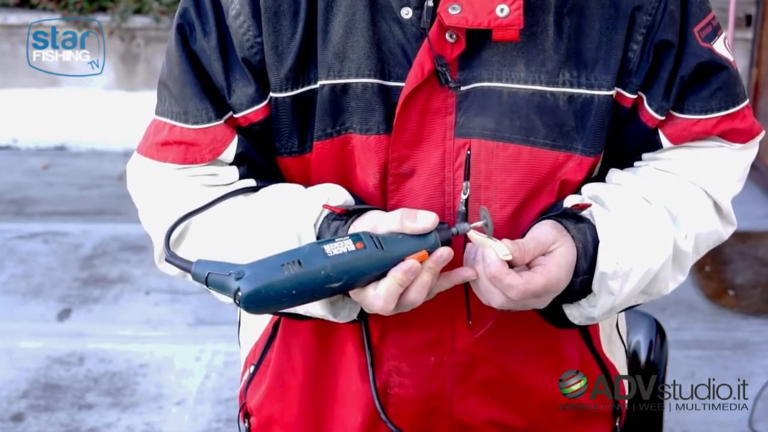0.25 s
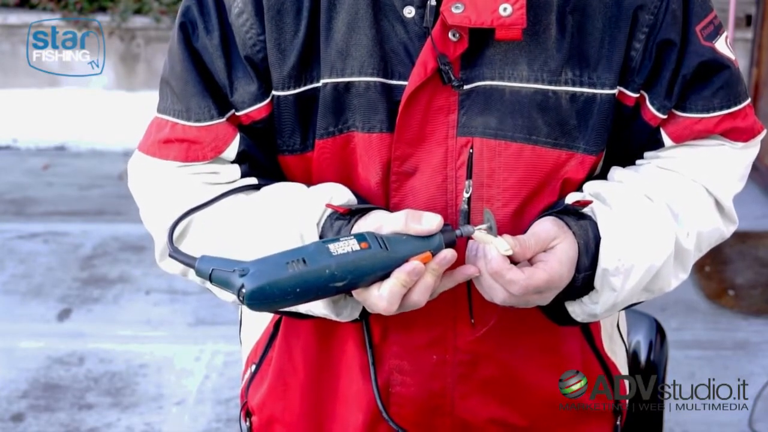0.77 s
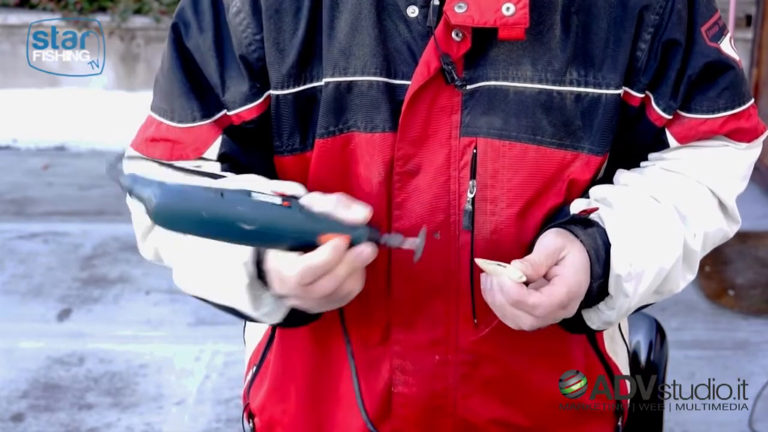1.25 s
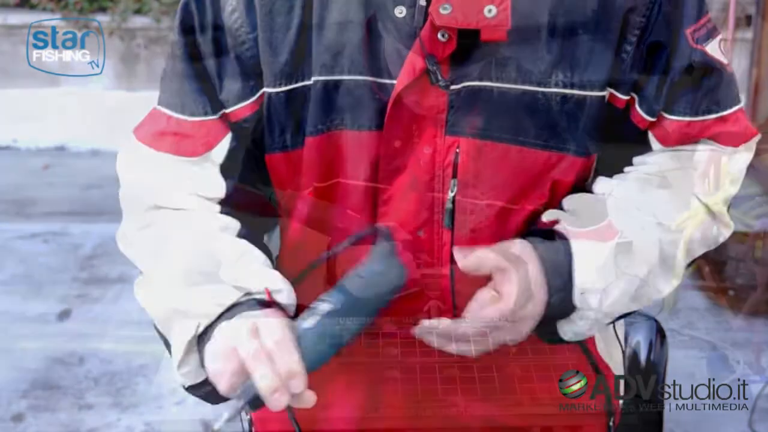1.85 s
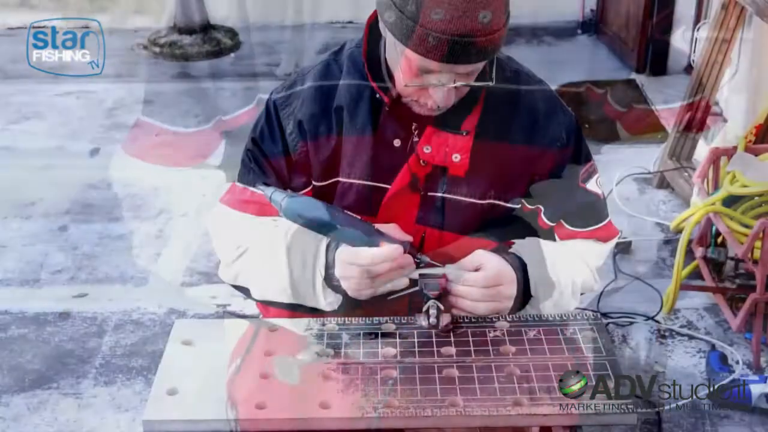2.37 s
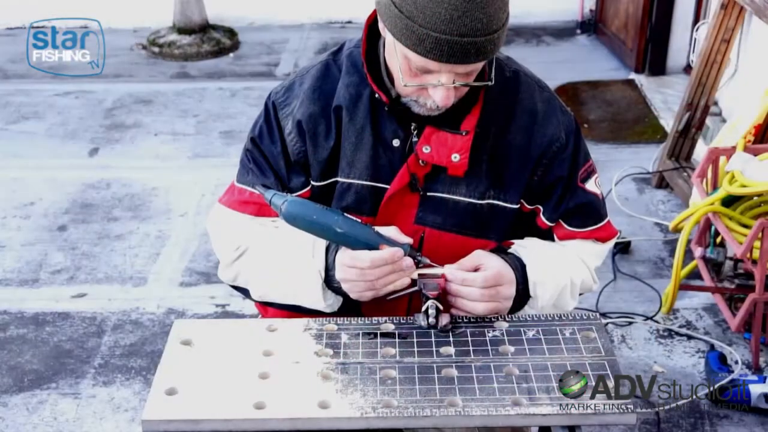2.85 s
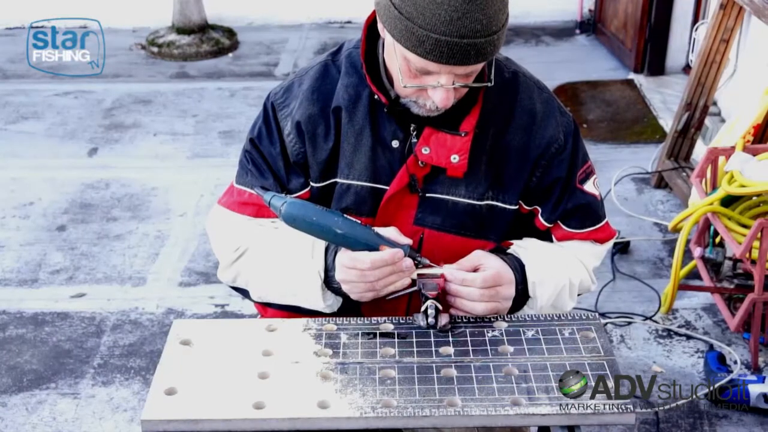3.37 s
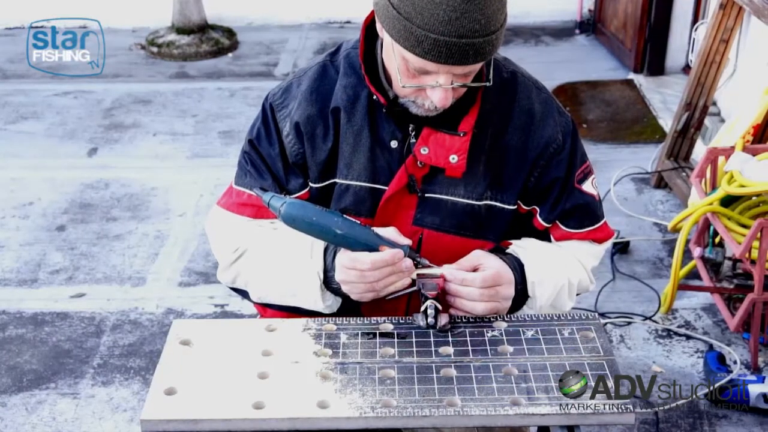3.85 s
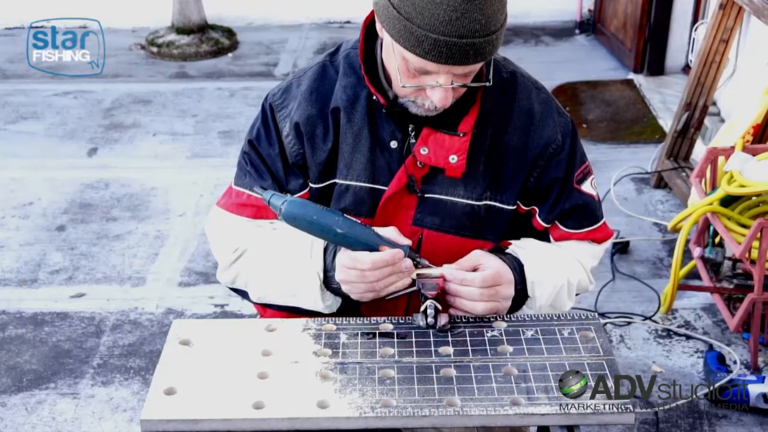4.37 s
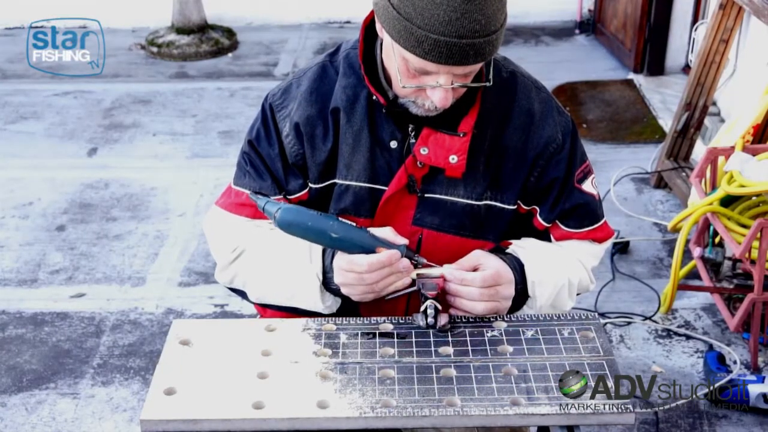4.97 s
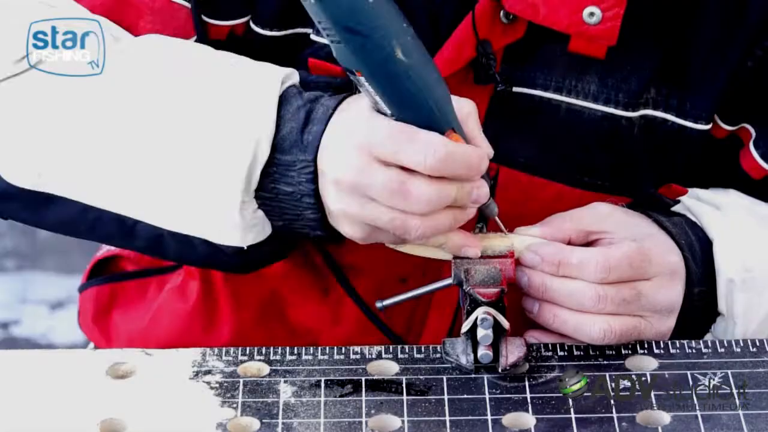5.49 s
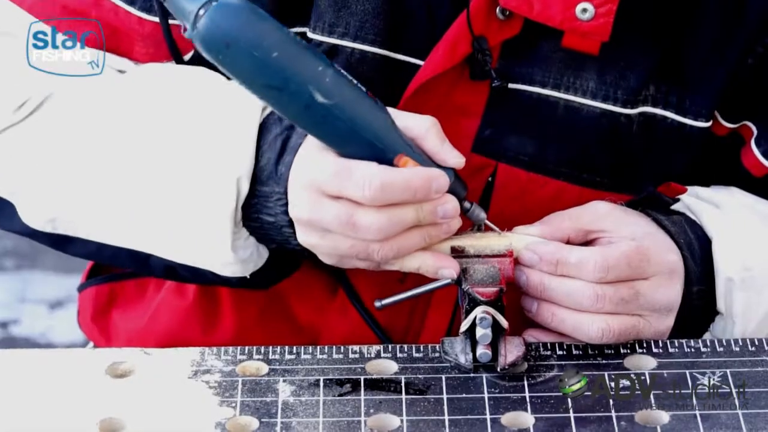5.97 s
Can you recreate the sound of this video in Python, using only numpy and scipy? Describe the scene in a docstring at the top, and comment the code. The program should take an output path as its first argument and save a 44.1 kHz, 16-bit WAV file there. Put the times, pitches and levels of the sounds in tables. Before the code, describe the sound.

A small rotary tool whines and rasps through wood, switches off with a click, then abruptly whines again closer, drilling wood in rough, uneven bites.

```python
"""In a workshop, a small corded rotary tool spins at about 190 turns a second and bites into hand-held wood.
It is switched off and fades; a second scene follows abruptly, closer, where it drills wood in a vice.
The motor sings in shaft orders, commutator and bearing lines, over fan noise modulated by the turning shaft.
The slightly eccentric bit strikes the wood once a turn: a repeating scrape and torn-chip noise excite
moving resonances. Snags, clicks, a squeak, a whir, low shaking and a quiet noise floor complete the sound."""
import sys
import numpy as np
from scipy import signal
from scipy.fft import rfft, irfft, next_fast_len
from scipy.io import wavfile
from scipy.ndimage import uniform_filter1d, map_coordinates

SR = 44100
rng = np.random.default_rng(int(sys.argv[2]) if len(sys.argv) > 2 else 0)


def unload_audio(sound):
    """Save the sound as a 16-bit wav file, at the path given as the first command line argument."""
    columns = np.transpose(np.atleast_2d(sound))
    # keep every value between -1 and 1, then stretch to whole-number steps
    steps = np.round(np.clip(columns, -1, 1) * 32767)
    wavfile.write(sys.argv[1], SR, steps.astype(np.int16))


N = 274743
T = np.arange(N) / SR
EDIT_S = 2.1715  # the second scene begins
LIFT_S = 1.088  # the blade leaves the wood

# Shaft speed, sagging under load, before any coasting is subtracted.
# Each row: time in seconds, speed in turns per second.
SPEED = [(0.0, 188.8), (0.31, 188.3), (0.5, 186.5), (0.55, 182.8), (0.65, 161.2), (0.76, 151.6),
         (0.9, 149.4), (1.02, 149.8), (1.06, 155.2), (1.11, 176.1), (1.14, 182.2), (1.2, 186.2),
         (1.28, 188.1), (2.169, 188.3), (2.17, 189.7), (2.53, 190.3), (2.96, 190.4), (3.22, 189.5),
         (3.44, 187.9), (3.56, 189.2), (3.75, 188.6), (4.01, 186.5), (4.26, 185.4), (4.56, 181.8),
         (4.64, 179.8), (4.74, 179.6), (4.81, 186.0), (4.87, 188.8), (4.96, 190.0), (5.09, 190.1),
         (5.24, 188.6), (5.38, 184.7), (5.48, 183.5), (5.57, 185.3), (5.68, 185.5), (5.8, 187.0),
         (5.89, 185.8), (6.1, 187.1), (6.22, 187.0)]
# Load inferred from speed sag, blade then drill.
# Each row: free speed in turns per second, sag in turns per second for about two thirds of full load.
LOADING = [(188.6, 15), (190.2, 5)]
# Levels of the tool before load and run-down: at the wood, lifted away, at the vice, and close up.
# Each row: start in seconds, then fan, commutator, bearing, shake at twice and at three times
# the shaft rate, and rumble, all in dB.
IDLE_LEVELS = [(0, -42.5, -49.5, -60, -75, -72, -67), (1.088, -45, -58.5, -64, -81, -78, -62.5),
               (EDIT_S, -32, -42.5, -44.5, -67.5, -63, -50.5), (5.5, -34, -45, -51, -74.5, -65.5, -52.5)]
# What full load adds, blade then drill. Each row: the same six levels, in dB.
LOADED_LEVELS = [(2.3, -7, -3, 17, 2, 15.4), (2.04, -6, -9.5, 21.8, 12.5, 7.6)]
# Exponent applied to the load for each of the six levels; a large one makes the level answer late.
LOAD_BEND = (0.56, 1.7, 0.94, 0.62, 0.4, 0.76)
INERTIA_S = 0.063  # while the shaft speeds up, part of the sag is only inertia
# At switch-off the shaft slows, the lines stop, and the fan noise fades ever faster.
SWITCH_S, COAST_HZ_PER_S = 1.358, 120
LINES_OFF_DB_PER_S, FADE_DB_PER_S2 = 250, 69

# Relative fan-noise spectra, one table a scene. Each row: frequency in Hz, density in dB per Hz.
FAN = [
    [(100, -33), (300, -33), (700, -12), (1300, -13), (1850, -3.5), (2500, -6), (3300, -11.5),
     (4600, -14.5), (5300, -10), (7500, -5), (9000, -2.5), (10500, -2.5), (11500, -7), (15600, -17)],
    [(100, -8.5), (500, -13.5), (1000, -7), (1700, -1), (2700, -4.5), (3700, -11.5), (4800, -12),
     (6400, -3), (7500, 0.5), (8800, 0), (10400, -0.5), (10800, -6.5), (12400, -3), (15600, -13.5)],
]
# Housing whistles in the fan's air at the vice. Each row: frequency in Hz, width in Hz, level in dB re the fan.
HOUSING = [(7470, 360, -18.5), (8780, 250, -15.5), (10400, 220, -19.5)]
# Shaft harmonics. Each row: order in cycles a turn, level in dB re the fan in scene one, in scene two.
SHAFT = [(4, -25, -29), (5, -24, -25), (6, -28, -35), (9, -26, -29), (18, -22, -31), (25, -35, -32),
         (29, -35, -27)]
# Bearing lines. Each row: multiple of the ball-pass rate, shaft orders added,
# level in dB re the bearing level in scene one, in scene two.
BEARING = [(1, 0, -4, 0), (1, 1, -15, -12), (1, 2, -14, -2), (2, -1, -15, -5), (1, 4, -15, -3),
           (1, 5, 0, -16), (2, 1, 0, -7), (1, 7, -1, -11), (2, 4, -12, -10), (3, 0, -15, -8),
           (1, 10, -5, -11), (5, 0, -20, -17), (6, 0, -8, -18), (5, 12, -20, -9), (9, 0, -10, -9),
           (10, 0, -10, 0), (11, 0, -10, -10), (12, 0, -5, -9)]
COMMUTATOR_BARS = 12  # bars a turn
BALL_PASSES = 4.593  # ball passes a turn
MAINS_HZ = 100  # torque beats at twice the line frequency

# Cutting levels, one table a cut.
# Each row: time in seconds, knock level, ring level and rasp level in dB, knock pitch in Hz.
CUTS = [
    [(0.325, -46, -44, -44, 1890), (0.367, -38.5, -37, -46, 1890), (0.461, -51, -47, -47, 1960),
     (0.495, -47, -38, -40.5, 1980), (0.56, -39, -42.5, -31, 2040)],
    [(0.56, -44, -41, -36, 1900), (0.634, -45.5, -40, -31, 1800), (0.822, -52, -44, -33, 1950),
     (0.852, -45, -39.5, -36, 1860), (0.994, -42.5, -43.5, -31, 1660), (1.058, -56, -43, -33, 1800),
     (1.08, -39, -37, -47, 1820), (1.095, -59, -67, -51, 1820)],
    [(2.82, -56, -45, -43, 1540), (2.912, -41, -38.5, -35.5, 1550), (2.97, -44, -44.5, -36, 1660),
     (3.068, -36.5, -32, -31.5, 1500), (3.1, -43, -38.5, -37.5, 1630), (3.26, -35.5, -33.5, -32.5, 1580),
     (3.376, -35.5, -39, -29.5, 1650), (3.392, -43, -35.5, -39, 1620), (3.438, -31.5, -30, -27, 1500),
     (3.492, -32, -30.5, -32, 1470), (3.53, -50, -35, -39, 1520)],
    [(3.53, -40.5, -44, -42, 1430), (3.688, -36.5, -36, -35, 1510), (3.744, -40, -29.5, -27, 1470),
     (3.834, -33.5, -31.5, -28.5, 1580), (3.92, -35, -30.5, -26, 1500), (3.96, -30, -27, -25, 1450),
     (4.01, -28, -27, -24.5, 1460), (4.052, -30, -31.5, -26, 1370), (4.184, -32.5, -34, -24, 1580),
     (4.3, -39.5, -38.5, -27, 1840), (4.406, -33.5, -39, -29, 1510), (4.484, -38.5, -61, -30.5, 1390),
     (4.692, -36.5, -69, -33.5, 1270), (4.774, -34, -30, -25, 1630), (4.8, -39, -59, -48, 1630)],
    [(5.13, -42, -52, -49, 1780), (5.184, -35, -48, -32, 1680), (5.258, -30.5, -38, -29.5, 1530),
     (5.332, -36, -41, -29, 1740), (5.39, -31.5, -48, -30, 1780), (5.454, -34.5, -50, -29.5, 1440),
     (5.516, -33, -51, -31, 1570), (5.535, -42, -41, -32, 1620)],
    [(5.535, -51, -53, -33, 1810), (5.621, -44, -45, -33, 1800), (5.685, -37, -41.5, -32.5, 1680),
     (5.759, -43.5, -41.5, -34, 1780), (5.93, -41, -40.5, -35.5, 1700), (6.015, -36, -35.5, -33.5, 1710),
     (6.13, -39.5, -40, -36.5, 1750), (6.23, -42, -45, -36.5, 1700)],
]
# Relative spectra of torn chips sounding through blade, bit and housing, keyed by bit and distance.
# Each row: frequency in Hz, density in dB per Hz.
RASP = {"close": [(2240, -38), (3800, -13), (4100, -16), (4180, 7.5), (4430, 4), (5290, -3.5), (6510, 7.5),
        (8190, -35), (9060, 0), (10200, 5), (11700, -5), (14700, -23), (15600, -16)],
        "blade": [(2060, -5.5), (3500, -10), (4120, -3), (4640, -24), (5630, -9), (6380, 0.5), (7550, 2.5),
        (8780, -11), (10400, -2.5), (12900, -16), (15600, -20)], "drill": [(2240, -4), (3800, -2),
        (4080, 0), (4350, 2.5), (4700, 0.5), (5510, -1.5), (6700, 4.5), (8100, -3.5), (9110, 5.5),
        (10300, -1), (11000, -15), (12600, -1), (15600, -25)]}
# The rasp spectrum that each cut takes, as a key.
BITS = ["blade", "blade", "drill", "drill", "drill", "close"]
# Wood resonances, one row a cut. Each row: knock width in Hz, ring pitch over knock pitch, ring width in Hz,
# rasp pitch in Hz at the start, at the end, lowest pitch passed to knock and ring in Hz.
WOOD = [(342, 1.65, 760, 5300, 5400, 920), (1610, 1.76, 1650, 8400, 7300, 910),
        (1200, 1.82, 760, 8000, 8200, 540), (1310, 1.964, 1120, 7200, 9800, 590),
        (1500, 1.77, 1300, 8700, 8300, 510), (700, 1.83, 1200, 6800, 7800, 870)]
# How far the teeth tear rather than tap, one row a cut.
# Each row: roughness from 0 to 1 at the start, at the end, exponent of its course.
ROUGH = [(.09, .7, 3.5), (.8, .92, .3), (.42, .58, 1), (.55, .04, .6), (.45, .25, 1), (.17, .2, 1)]
# Shank rings of the tearing bit. Each row: frequency in Hz, width in Hz,
# level in dB re the wood ring when fully rough.
SHANK = [(4300, 350, -13), (5150, 400, -10)]
# The bit snags. Each row: time in seconds, peak in dB, share of wood ring from 0 to 1.
SNAGS = [(.6197, -18, .3), (.7958, -14, .15), (.8157, -14, .2), (.8357, -15, .45), (.8556, -15, .8),
         (.8756, -17, .7), (.896, -19, .6), (1.078, -21, .8), (3.495, -13, .4), (4.4102, -13, .2),
         (4.743, -14, .3), (4.7704, -14, .4), (5.245, -18, .5), (5.262, -16, .5), (5.272, -17, .5)]

# Once-a-turn shake in the hands and the vice. Each row: time in seconds, rms level in dB before run-down.
SHAKE = [(0, -68.5), (0.5, -63.5), (0.8, -58), (1.0, -54), (1.11, -61), (1.17, -59.5), (2.169, -65),
         (2.172, -54), (2.67, -54.5), (3.38, -58.5), (3.47, -52), (3.67, -54.5), (3.8, -53), (4.0, -43),
         (4.12, -42.5), (4.28, -36.5), (4.56, -30.5), (4.75, -32.5), (4.8, -53), (5.13, -59), (5.22, -44),
         (5.45, -37), (5.55, -41.5), (5.9, -45.5), (6.23, -40)]
SHAKE_WAVER_DB, RUMBLE_WAVER_DB = 3.5, 1.8
# The switch, the housing and the wood let go.
# Each row: time in seconds, peak in dB, pitch in Hz, 60 dB decay time in seconds.
CLICKS = [(1.3548, -24, 9000, 0.0065), (1.3595, -26.5, 1910, 0.022), (1.361, -25, 8060, 0.0087),
          (1.363, -40, 32, 0.2), (1.605, -42, 5000, .008), (1.642, -46, 400, .025),
          (1.711, -47, 200, 0.028), (4.773, -20, 1580, 0.052), (1.993, -54, 600, .008),
          (1.9985, -36.5, 130, 0.029), (2.016, -50, 7000, .006), (2.045, -40, 9000, 0.0048),
          (2.0495, -46, 2520, 0.013), (2.069, -41, 2850, .015)]
# A fluttering whir as the slowing tool swings past.
WHIR_S, WHIR_HALF_S, WHIR_DB, WHIR_HZ, WHIR_WIDTH_HZ = 1.62, .17, -64, 5000, 1100
# Relative noise-floor spectrum. Each row: frequency in Hz, density in dB per Hz.
FLOOR = [(20, 10), (35, -2), (120, -10), (300, -8.5), (1200, -19), (3000, -24.5), (9000, -27.5),
         (15600, -30)]
FLOOR_DB = -61
EDGE_HZ = 15750


def gain_of(db):
    """An amplitude ratio is ten to the power of its decibels over twenty."""
    return 10 ** (np.asarray(db) / 20)


def evened(x, size=None):
    """Dividing by the root of mean power gives rms 1, overall or in a running window of samples."""
    power = np.mean(x ** 2) if size is None else abs(uniform_filter1d(x ** 2, size))
    return x / np.sqrt(power + 1e-20)


def columns(rows, t):
    """Linear interpolation reads every column of a curve table at the times t."""
    s, *rest = np.transpose(rows)
    return [np.interp(t, s, c) for c in rest]


def coloured(x, points):
    """Spectral weighting: dB points joined over log frequency shape x, which is then scaled to rms 1."""
    size = next_fast_len(len(x))
    hz, db = np.transpose(points)
    log_hz = np.log(np.fft.rfftfreq(size, 1 / SR) + 1)
    shape = np.interp(log_hz, np.log(hz), db, left=-90)
    shaped = irfft(rfft(x, size) * gain_of(shape), size)
    return evened(shaped[:len(x)])


def resonate(x, hz, width):
    """Heterodyning: shift hz to zero, smooth twice and shift back, which gives a steep moving resonance."""
    turn = np.exp(2j * np.pi * np.cumsum(hz * np.ones(len(x))) / SR)
    r = np.exp(-np.pi * width / SR)
    smooth = signal.lfilter([(1 - r) ** 2], [1, -2 * r, r * r], x / turn + 1e-18)
    return 2 * (turn * smooth).real


def wander(hz):
    """Slow random drift: straight lines join normal random knots, hz of them a second."""
    knots = rng.standard_normal(int(N / SR * hz) + 2)
    return np.interp(T, np.arange(len(knots)) / hz, knots)


def add(mix, s, sound):
    """Superposition of a sound on the mix, in place, from s seconds on."""
    part = mix[round(s * SR):][:len(sound)]
    part += sound[:len(part)]


def tool_state():
    """Load is read from the shaft's sag and alters its levels; returns turns, six levels in dB, line gain."""
    second = T >= EDIT_S
    speed, = columns(SPEED, T)
    free, sag = np.where(second, *np.array(LOADING)[::-1, :, None])
    gaining = uniform_filter1d(np.gradient(speed, 1 / SR).clip(-500, 500), 900)
    load = 1 - np.exp(-np.maximum(free - speed - INERTIA_S * gaining, 0) / sag)
    load[(T > LIFT_S) & ~second] = 0

    idle = np.array(IDLE_LEVELS)
    idle_db = idle[np.searchsorted(idle[1:, 0], T), 1:].T
    full_load_db = np.where(second, *np.array(LOADED_LEVELS)[::-1, :, None])
    db = idle_db + load ** np.c_[list(LOAD_BEND)] * full_load_db

    off_s = np.maximum(T - SWITCH_S, 0) * ~second
    fade_db = FADE_DB_PER_S2 * off_s ** 2
    stop_db = np.minimum(LINES_OFF_DB_PER_S * off_s, 60)
    lost_db = np.array([fade_db, *[stop_db] * 4, np.minimum(fade_db, 6)])
    turns = np.cumsum(speed - COAST_HZ_PER_S * off_s) / SR
    return turns, db - lost_db, gain_of(-stop_db)


def line(turns, db):
    """A nearly pure tone: a sine of rms level db, wavering a little in strength and phase."""
    phase = 2 * np.pi * (turns + rng.random() + .02 * wander(hz=40))
    return np.sqrt(2) * gain_of(db + 2.0 * wander(hz=14)) * np.sin(phase)


def fan(turns, fan_db):
    """Amplitude modulation: turbulent noise throbs once and twice a turn and excites housing resonances."""
    second = T >= EDIT_S
    throb = 1 + 0.2 * np.cos(4 * np.pi * turns) + 0.11 * np.cos(2 * np.pi * turns)
    flicker_db = 0.84 * wander(hz=298.7) + 0.75 * wander(hz=10)
    air = rng.standard_normal(N) * throb * gain_of(flicker_db)
    out = gain_of(fan_db) * np.where(second, coloured(air, FAN[1]), coloured(air, FAN[0]))
    for hz, width, db in HOUSING:
        out += second * gain_of(fan_db + db) * evened(resonate(air, hz, width))
    return out


def motor(turns, fan_db, bars_db, balls_db, powered):
    """Periodic forces give line spectra over fan noise: shaft orders, ball passes, commutator and mains torque."""
    second = T >= EDIT_S
    out = fan(turns, fan_db)
    for order, *db in SHAFT:
        out += powered * line(order * turns, fan_db + np.where(second, db[1], db[0]))
    for balls, added, *db in BEARING:
        cycles = (balls * BALL_PASSES + added) * turns
        out += line(cycles, balls_db + np.where(second, db[1], db[0]))
    out += line(COMMUTATOR_BARS * turns, bars_db)
    return out + powered * line(MAINS_HZ * T, fan_db - np.where(second, 24, 34))


def scrape(turns, count=60):
    """Periodic excitation: the teeth meet the same groove each turn, so one pattern repeats and slowly changes."""
    shapes = int((turns[-1] - turns[0]) / 17) + 2  # a new pattern every 17 turns
    place = np.arange(1024) / 1024  # fraction of a turn
    pattern = rng.standard_normal((shapes, 128)) * np.exp(-np.arange(128) / 92.0)
    pattern[:, 0] += 3.0  # every pattern shares a sharp blow at first contact
    orders = rfft(pattern)[:, :count]
    # orders 1 to 3 are left to the once-, twice- and three-times-a-turn shake
    orders = orders * (np.arange(count) > 3)
    orders /= (abs(orders) + 1e-9) ** .6  # compress the random order strengths, for a more even scrape
    pattern = irfft(orders, len(place))
    pattern = np.c_[pattern, pattern[:, :1]]  # close the turn on itself
    where = [(turns - turns[0]) / 17, turns % 1 * len(place)]
    return evened(map_coordinates(pattern, where, order=1))


def cut(rows, rasp_colour, wood, turns):
    """Forced resonance: one scrape a turn rings the wood at two moving pitches, with a puff of torn chips."""
    span = slice(round(rows[0][0] * SR), round(rows[-1][0] * SR))
    t, turns = T[span], turns[span]
    knock_db, ring_db, rasp_db, knock_hz = columns(rows, t)
    knock_width, ratio, ring_width, *rasp_hz, lowest_hz, first, last, power = wood
    rough = first + (last - first) * np.linspace(0, 1, len(t)) ** power

    first_turn = int(turns[0])
    nth = turns.astype(int) - first_turn
    luck = rng.standard_normal((nth[-1] + 1, 2))
    blow_s = np.interp(np.arange(len(luck)) + first_turn, turns, t)
    # blows that meet a torque peak of the mains land harder
    torque = np.cos(2 * np.pi * MAINS_HZ * blow_s + 4.1)
    blow_size = gain_of(rough * (1.16 * luck[:, 0] + 0.83 * torque)[nth])
    # a light touch grips and slips, drawn afresh every three turns
    chatter = gain_of(11 * rough * (1 - rough) ** 2 * luck[nth // 3, 1])

    puff_shape = .5 + np.exp(-(turns % 1) / 0.3)
    puffs = blow_size * puff_shape * rng.standard_normal((2, len(t)))
    teeth = blow_size * scrape(turns)
    drive = np.sqrt(1 - rough) * teeth + np.sqrt(rough) * evened(puffs[0])
    drive = signal.sosfilt(signal.butter(3, lowest_hz, "high", fs=SR, output="sos"), drive)

    knock = evened(resonate(drive, knock_hz, knock_width), size=3000)
    ring = evened(resonate(drive, ratio * knock_hz, ring_width), size=3000)
    shank = sum(gain_of(db) * evened(resonate(drive, hz, width)) for hz, width, db in SHANK)
    ring += np.sqrt(rough) * shank

    chips = .7 * np.sqrt(1 - rough) * teeth + evened(puffs[1])
    gliding = resonate(evened(chips), np.linspace(*rasp_hz, len(t)), 3000)
    rasp = evened(coloured(chips, rasp_colour) + 0.95 * gliding, size=3000)
    sound = chatter * (gain_of(knock_db) * knock + gain_of(ring_db) * ring) + gain_of(rasp_db) * rasp
    return t[0], sound * signal.windows.tukey(len(t), 300 / len(t))  # 150 samples of fade at each end


def snags():
    """Transient excitation: short decaying noise bursts sound part as wood ring and part as tearing."""
    out, t = np.zeros(N), np.arange(500) / SR
    for s, db, share in SNAGS:
        envelope = gain_of(-60 * t / .012) * np.minimum(t / .0006, 1)
        burst = rng.standard_normal(len(t)) * envelope
        wood_ring = resonate(burst, 3130, 2800)
        tearing = resonate(burst, 7700, 4400) + .5 * resonate(burst, 8800, 4000)
        burst = share * wood_ring + (1 - share) * tearing
        add(out, s, gain_of(db) * burst / abs(burst).max())
    return out


def hands(turns, shake_db, rumble_db, powered):
    """Forced vibration: the hands and the vice shake at the lowest three shaft orders, over a lumpy rumble."""
    shake = powered * gain_of(*columns(SHAKE, T)) * np.sin(2 * np.pi * turns)
    for k, db in enumerate(shake_db, 2):
        shake += gain_of(db + SHAKE_WAVER_DB * wander(hz=9.7)) * np.sin(2 * np.pi * k * turns + k)
    # rumble spectrum: Hz, dB per Hz
    colour = [(14, -21), (28, 0.5), (60, -4.5), (100, -11), (200, -17.5), (400, -47)]
    rumble = coloured(rng.standard_normal(N), colour)
    return np.sqrt(2) * shake + gain_of(rumble_db + RUMBLE_WAVER_DB * wander(hz=6.7)) * rumble


def clicks():
    """Damped oscillation: each click is an exponentially decaying sine with a randomly drifting phase."""
    out, t = np.zeros(N), np.arange(7000) / SR
    for s, db, hz, t60 in CLICKS:
        wobble = np.cumsum(rng.standard_normal(len(t))) * .00004 * hz
        add(out, s, -gain_of(db - 60 * t / t60) * np.sin(2 * np.pi * hz * t + wobble))
    return out


def squeak():
    """A linear chirp: a brief tone falls in pitch as the tool swings away."""
    out, t = np.zeros(N), np.arange(round(.075 * SR)) / SR
    tone = np.sin(2 * np.pi * (630 * t - 330 * t ** 2))
    add(out, 1.49, gain_of(-61) * tone * signal.windows.tukey(len(t), .5))
    return out


def whir():
    """Narrow-band noise under a Gaussian envelope swells and fades in random flutters."""
    air = evened(resonate(rng.standard_normal(N), WHIR_HZ, WHIR_WIDTH_HZ))
    fall_db = np.minimum(6 * ((T - WHIR_S) / WHIR_HALF_S) ** 2, 80)
    return air * gain_of(WHIR_DB + 3.3 * wander(hz=35) - fall_db)


def noise_floor():
    """Stationary random noise of fixed spectrum and level lies under everything."""
    return gain_of(FLOOR_DB) * coloured(rng.standard_normal(N), FLOOR)


def scene():
    """Superposition: all the sources sum at one microphone, copied to both channels."""
    turns, db, powered = tool_state()
    mix = motor(turns, *db[:3], powered)
    for rows, colour, wood, rough in zip(CUTS, BITS, WOOD, ROUGH):
        add(mix, *cut(rows, RASP[colour], wood + rough, turns))
    mix += snags() + hands(turns, db[3:5], db[5], powered)
    mix += clicks() + squeak() + whir() + noise_floor()
    return np.array([mix, mix])


def record(dry):
    """Band limiting: a linear-phase low-pass filter removes the treble above EDGE_HZ."""
    low_pass = signal.firwin(511, EDGE_HZ, window=("kaiser", 9), fs=SR)
    return signal.oaconvolve(dry, low_pass[None], "same")


dry = scene()
out = record(dry)
unload_audio(out)
```